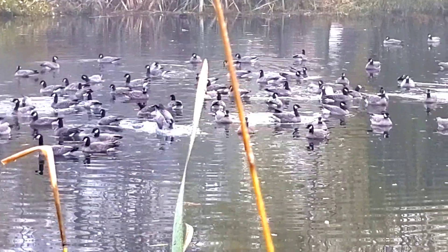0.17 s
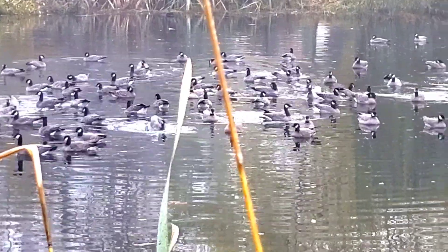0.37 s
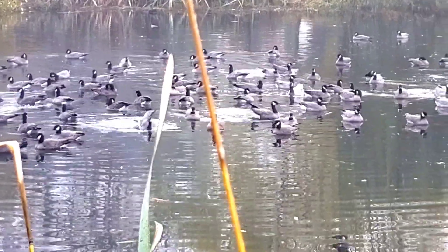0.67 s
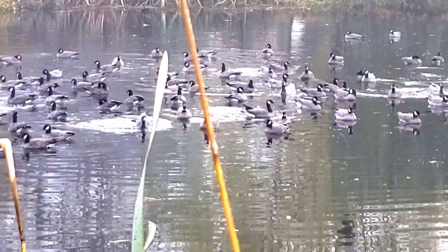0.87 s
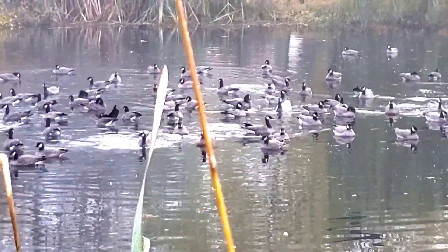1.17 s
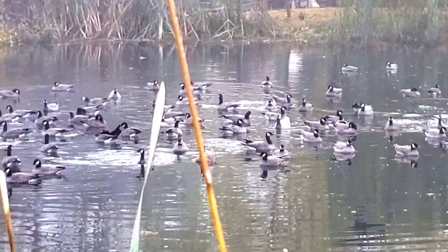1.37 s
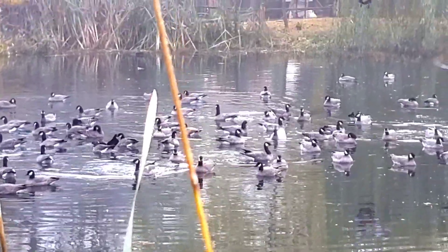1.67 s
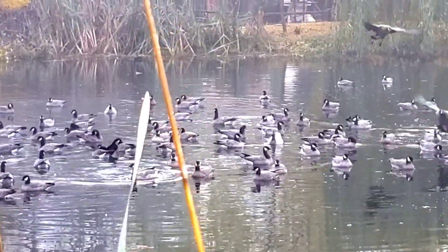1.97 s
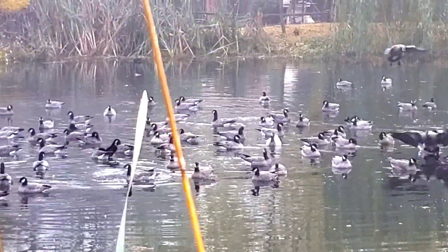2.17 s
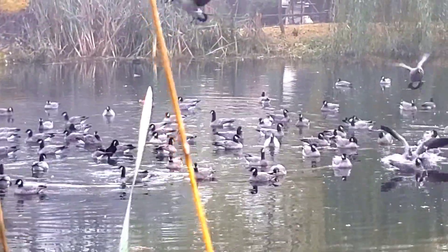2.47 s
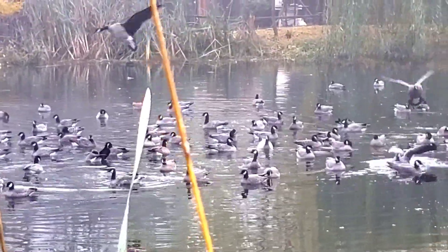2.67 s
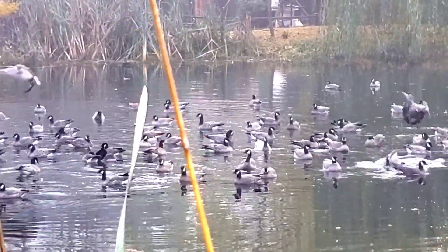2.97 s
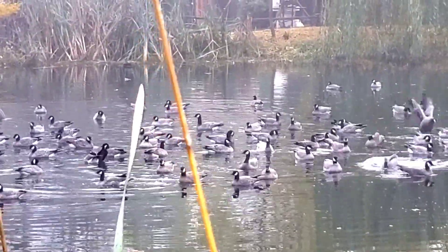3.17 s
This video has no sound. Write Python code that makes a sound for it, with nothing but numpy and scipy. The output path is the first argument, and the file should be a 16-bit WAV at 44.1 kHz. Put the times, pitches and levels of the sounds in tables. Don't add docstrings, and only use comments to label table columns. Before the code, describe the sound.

Geese honk over a pond, nasal and ringing, with overlapping calls from 0.2 to 0.7 seconds, softer ones around 1.0 to 1.3, a strong pair near 1.6 and a sharp, higher cry at 2.1. Banks echo them. From 2.3, landings thump, plop and slap with spray; low churning swells. Fainter honks follow near 2.9 and 3.2. Distant engine and traffic rumble and light water wash continue; right side muffled.

```python
import sys
import numpy as np
from scipy import signal
from scipy.fft import rfft, irfft, next_fast_len
from scipy.io import wavfile
from scipy.ndimage import uniform_filter1d, map_coordinates

SR = 44100
rng = np.random.default_rng(int(sys.argv[2]) if len(sys.argv) > 2 else 0)


def to_linear_factor(level_db):
    exponent = np.asarray(level_db, float) / 20
    return 10 ** exponent


def master_out(mix):
    frames = np.transpose(np.atleast_2d(mix))
    ceiling = np.clip(frames, -1, 1)
    pcm = np.round(ceiling * 32767).astype(np.int16)
    wavfile.write(sys.argv[1], SR, pcm)


N = 145971
TOP_HZ = 15750

# start_s, level_db
ENGINE_LOAD = [(0.1, -53.5), (0.14, -48.5), (0.63, -44.5), (0.99, -49), (1.04, -44), (1.55, -49.5),
               (1.62, -44.5), (2.49, -48.5), (2.5, -45), (3.29, -47), (3.31, -44)]
# freq_hz, level_db (per Hz)
DRONE_COLOUR = [(15, -65), (25, -45), (44, -8), (65, 3.5), (103, -7), (141, -10), (205, -18), (236, -16),
                (330, -21), (430, -48), (730, -120)]
# freq_hz, level_db (per Hz)
TRAFFIC_COLOUR = [(120, -29), (200, -0.5), (232, -16.5), (301, -23.5), (352, -13.5), (382, -11),
                  (657, -2.5), (3000, -36), (3900, -81), (6600, -120)]
# start_s, level_db
WASH_LEVEL = [(.09, -64.5), (.2, -59.5), (.25, -57), (.48, -58), (.66, -79), (1.1, -66.5), (1.5, -74.5),
              (1.7, -62), (2.05, -69.5), (2.3, -62.5), (2.46, -61.5), (2.75, -63), (3, -68.5),
              (3.31, -65.5)]
# freq_hz, level_db (per Hz)
WASH_COLOUR = [(880, 0), (1500, 2), (1620, 0), (2050, 1), (4120, -10), (5690, -25), (6590, -16),
               (10500, -27.5), (15600, -23)]
# start_s, pitch_hz
HONK_PITCH = [
    [(.217, 1015), (.232, 1058), (.245, 1069), (.282, 963)],
    [(.221, 1005), (.246, 958)],
    [(.225, 717), (.27, 750), (.307, 733)],
    [(.308, 746), (.335, 809), (.348, 856), (.357, 909), (.376, 895)],
    [(.364, 899.6), (.43, 813)],
    [(.355, 742), (.385, 800), (.415, 718)],
    [(.415, 677), (.44, 684), (.452, 670)],
    [(.455, 1038), (.464, 1075), (.495, 1053)],
    [(.482, 964), (.512, 861)],
    [(.605, 805), (.625, 828), (.652, 770)],
    [(.992, 809), (1.02, 870), (1.056, 771)],
    [(1.093, 738), (1.116, 765), (1.166, 654)],
    [(1.21, 663), (1.245, 774), (1.286, 655)],
    [(1.54, 722), (1.585, 872), (1.618, 813)],
    [(1.566, 913), (1.6, 1082), (1.62, 1120)],
    [(1.604, 1076), (1.63, 1092), (1.672, 971)],
    [(2.101, 1884), (2.118, 1839), (2.138, 2029), (2.16, 2116), (2.192, 2066)],
    [(2.178, 985), (2.216, 888)],
    [(2.868, 846.5), (2.89, 880.5), (2.91, 864), (2.942, 750)],
    [(3.215, 735), (3.235, 808), (3.275, 694)],
    [(.2, 1007), (.226, 980)],
    [(2.082, 3790), (2.108, 3670)],
]
# level_db, throat_hz, tilt_db (per octave), break_s (9 = never), echo_db
HONK_VOICE = [ (-26, 1870, -7.5, .228, 7), (-30.5, 1840, -8.5, .2, 11), (-43.5, 880, -5, 9, 5.5),
              (-24.5, 1960, -23, 9, 1), (-30.5, 1290, -10, .3, 1.5), (-36, 1600, -9, 9, -6),
              (-44.5, 700, -16, 9, 5), (-29, 2150, -8.5, 9, -9.5), (-30, 1390, -11, .4, -0.5),
              (-46.5, 2440, -10, 9, -5), (-50, 2510, -8.5, 9, 3), (-39.5, 1440, -14.5, 9, -0.5),
              (-52.5, 2220, -9, 9, -12.5), (-33.5, 1690, -11.5, 9, 0), (-24.5, 2080, -23, 9, -1.5),
              (-26.5, 1835, -12.5, 1.5, 3.5), (-23, 1950, -6.5, 2.108, -5.5), (-33, 1430, -4.5, 2.1, 0.5),
              (-35, 1830, -13, 9, -5.5), (-50.5, 1380, -10, 9, -2), (-39, 1980, -14, 9, 1),
              (-48, 3760, -14, 9, -8)]
# fundamental_db, beak_hz, beak_db, breath_db
HONK_HEAD = [ (5, 2100, -29, -27), (-8, 2480, -16.5, -23), (-0.5, 2200, -16, -27), (0.5, 2137, -1.5, -24),
             (-7.5, 2200, -21, -26), (-2, 2100, -26, -25), (0.5, 2000, -24, -32), (0, 5400, -17, -23),
             (-5, 2440, -17, -21), (4, 4100, -16, -24), (6.5, 1880, 4, -32), (1.5, 3760, -4.5, -23),
             (14.5, 1420, 7.5, -27), (0.5, 4040, -22, -31), (1.5, 5900, -24, -28), (4, 2750, -19.5, -27),
             (-3, 3150, -21, -28), (-11.5, 2500, -6, -14.5), (6, 5300, -17, -43), (-4, 3300, -16, -32),
             (-5.5, 3000, -22, -28), (0, 7500, -24, -34)]
# freq_hz, level_db
PORT_COLOUR = [(500, -4), (2000, -0.5), (2900, 0.5), (3900, -6), (5300, -9.5), (6600, 4.5), (9000, -7),
               (13000, -10)]
# freq_hz, t60_s
BANK_DECAY = [(500, 0.77), (2000, 1.29), (5000, 1.46), (12000, 0.4)]
# delay_s, level_db
BANK_SLAPS = [(.105, -26), (.165, -26), (.205, -24), (.235, -25), (.275, -26.5)]
# start_s, level_db
CHURN_LEVEL = [(2, -61.5), (2.3, -51), (2.6, -54), (2.8, -50.5), (3.05, -54.5), (3.31, -48.5)]
# freq_hz, level_db (per Hz)
CHURN_COLOUR = [(90, -11), (140, 9.5), (300, 8.5), (500, -31)]
# start_s, cavity_hz, level_db, rise_s, t60_s
BODY_PLUNGES = [
    (2.509, 220, -38, 0.0066, 0.11),
    (2.569, 290, -35, 0.0033, 0.15),
    (2.627, 300, -39, 0.0045, .1),
    (2.3, 135, -36.5, 0.021, 0.28),
    (2.95, 145, -39, .08, 0.96),
    (3, 280, -42, 0.038, 0.41),
]
# start_s, peak_db, spray_t60_s
SURFACE_SLAPS = [(2.375, -62.5, 0.1), (2.403, -62, 0.18), (2.447, -58.5, 0.68), (2.49, -64.5, .4),
                 (2.626, -65, .1), (2.685, -76, .05), (2.711, -63, 0.23), (2.875, -69, 0.078),
                 (3.065, -65, 0.063), (3.165, -70, 0.086), (3.271, -68, 0.086)]
# freq_hz, level_db (per Hz)
SPRAY_COLOUR = [(300, -27), (1500, -2), (4000, 4), (5700, -11), (7000, -3.5), (11000, -13), (14000, -2),
                (15600, -9.5)]
# freq_hz, likeness (0 to 1)
PORT_LIKENESS = [(60, 1), (180, 0.82), (550, 0.98), (1650, 0.057), (4970, 0.06), (15000, 0.04)]
# freq_hz, difference_db
RIGHT_MUFFLE = [(60, 1.8), (130, 0.5), (290, 6), (640, 8), (1410, 14), (2500, 20), (5500, 31), (9000, 5.5),
                (13000, 11)]
# freq_hz, lag_radians
RIGHT_LAG = [(100, 0), (600, 0.48), (1500, 1.24), (15000, 1.7)]


def unit(x):
    return x / np.sqrt(np.mean(x ** 2) + 1e-20)


def along(points, hz):
    f, v = np.transpose(points)
    return np.interp(np.log(hz + 1), np.log(f + 1), v)


def curve(rows):
    return np.interp(np.arange(N) / SR, *np.transpose(rows))


def wobble(rate, size=N):
    knots = rng.standard_normal(int(size * rate / SR) + 4)
    return map_coordinates(knots, [np.arange(size) * rate / SR])


def filtered(x, response):
    m = next_fast_len(N + SR // 2)
    return irfft(rfft(x, m) * response(np.fft.rfftfreq(m, 1 / SR)), m)[..., :N]


def rush(spectrum, patchy_db):
    z = signal.stft(rng.standard_normal((2, N)), nperseg=512)[2]
    patches = uniform_filter1d(rng.standard_normal(z.shape[1:]), 6, 0)
    patches = unit(uniform_filter1d(patches, 10, 1))
    a, b = signal.istft(z * to_linear_factor(patchy_db * patches), nperseg=512)[1][:, :N]

    def colour(hz):
        return to_linear_factor(along(spectrum, hz))

    def like(hz):
        return np.clip(along(PORT_LIKENESS, hz), 0, 1)

    left = filtered(a, colour)
    shared = filtered(a, lambda hz: colour(hz) * like(hz))
    own = filtered(b, lambda hz: colour(hz) * np.sqrt(1 - like(hz) ** 2))
    return np.array([left, shared + own]) / np.std(left)


def engine():
    return to_linear_factor(curve(ENGINE_LOAD) + 2.5) * rush(DRONE_COLOUR, patchy_db=0.3)


def traffic():
    level_db = -48.5 + 1 * wobble(3.29)
    return to_linear_factor(level_db) * rush(TRAFFIC_COLOUR, patchy_db=1.5)


def droplets():
    return to_linear_factor(2.3 * wobble(150) + wobble(14))


def wash(drops):
    return to_linear_factor(curve(WASH_LEVEL) + 12) * drops * rush(WASH_COLOUR, patchy_db=2.0)


def honk(points, level_db, throat_hz, tilt_db, break_s, fundamental_db, beak_hz, beak_db, breath_db):
    s, hz = np.transpose(points)
    t = np.arange(s[0], s[-1], 1 / SR)
    arch = map_coordinates(hz, [np.interp(t, s, np.arange(len(s)))], order=2, mode="nearest")
    jitter = 1 + .005 * wobble(277, size=len(t))
    pitch = uniform_filter1d(arch, size=300) * jitter
    k = np.arange(1, 32)[:, None] / 2
    f = k * pitch
    faint = np.clip(-29 - level_db, 0, 12)

    def resonance(centre_hz, width_hz=350):
        return 1 / np.abs(1 + 2j * (f - centre_hz) / width_hz) ** 2

    peaks = resonance(throat_hz) + to_linear_factor(beak_db) * resonance(beak_hz)
    floor_db = -14 + faint / 2 + tilt_db * np.log2(np.maximum(f / throat_hz, 1))
    beak_low_cut = 1 + (630 / f) ** 8
    gain = (peaks + to_linear_factor(floor_db)) / beak_low_cut

    broken = np.clip((t - break_s) / 0.015, 0, 1)
    halfway, whole = to_linear_factor(0.5) * broken, to_linear_factor(-1 * broken)
    gain = gain * np.where(k % 1 > 0, halfway, whole) * (f < TOP_HZ)
    flutter = wobble(70.3, size=k.size * len(t)).reshape(k.size, -1)
    gain = gain * to_linear_factor(2.2 * np.sqrt(k) * flutter)

    chest_hz = 1150
    chest_db = fundamental_db * (f < chest_hz) * (f > chest_hz / 2)
    turned_db, air_db = .55 * (k == 1), 1.2 * (f / 5000) ** 2
    gain = gain * to_linear_factor(faint * (turned_db - air_db) + chest_db)

    phase = 2 * np.pi * np.cumsum(pitch) / SR
    tone = np.sum(gain * np.sin(k * phase + rng.uniform(0, 2 * np.pi, k.shape)), 0)
    breath = signal.lfilter([1, -1], [1, -1.5, .75], rng.standard_normal(len(t)))
    puffs = 1 + np.cos(phase)
    tone = tone + to_linear_factor(breath_db - faint / 2) * puffs * unit(breath)
    effort_db = 45 * (pitch / pitch.max() - 1)
    attack_s, release_s = 0.0073, 0.0067
    shape = np.clip((t - s[0]) / attack_s, 0, 1) * np.clip((s[-1] - t) / release_s, 0, 1)
    return to_linear_factor(level_db + 5) * np.sin(np.pi / 2 * shape) ** 2 * tone * to_linear_factor(effort_db)


def banks(call):
    near_db, far_db, far_s, far_spread_s = -18, -17, 0.22, 0.05
    right_db = 1
    hz, t, z = signal.stft(rng.standard_normal((2, SR * 2 // 3)), SR, nperseg=256)
    far = to_linear_factor(far_db - near_db) * np.exp(-.5 * ((t - far_s) / far_spread_s) ** 2)
    decay = to_linear_factor(-60 * t / along(BANK_DECAY, hz)[:, None])
    tail = signal.istft(z * (decay * (1 + far)), SR, nperseg=256)[1]
    tail = tail / np.linalg.norm(tail[0])
    return to_linear_factor(near_db) * signal.fftconvolve(call[None], tail, axes=1) * to_linear_factor([[0], [right_db]])


def geese():
    out = np.zeros((2, N + 2 * SR))
    for points, (*voice, echo_db), head in zip(HONK_PITCH, HONK_VOICE, HONK_HEAD):
        call = honk(points, *voice, *head)
        at = round(points[0][0] * SR)
        out[:, at:at + len(call)] += call
        wet = to_linear_factor(echo_db) * banks(call)
        out[:, at + 200:at + 200 + wet.shape[1]] += wet
        dulled = uniform_filter1d(call, size=5)
        for delay_s, level_db in BANK_SLAPS:
            start = at + round(delay_s * SR)
            uneven_db = rng.normal(0, 1.8, (2, 1))
            out[:, start:start + len(call)] += to_linear_factor(echo_db + level_db + uneven_db) * dulled
    return filtered(out[:, :N], lambda hz: to_linear_factor(along(PORT_COLOUR, hz) - along(PORT_COLOUR, 2980)))


def churn():
    return to_linear_factor(curve(CHURN_LEVEL) + 2.15 * wobble(13)) * rush(CHURN_COLOUR, patchy_db=2.5)


def dying(start_s, t60_s):
    t = np.arange(N) / SR
    return to_linear_factor(-60 * np.clip(t - start_s, 0, 2) / t60_s) * (t > start_s)


def plunges():
    t = np.arange(N) / SR
    out = np.zeros(N)
    for start_s, cavity_hz, level_db, rise_s, t60_s in BODY_PLUNGES:
        level = to_linear_factor(level_db + 2.4 * wobble(30.07))
        rise = np.clip((t - start_s) / rise_s, 0, 1)
        pitch = cavity_hz * (1 + 0.0815 * wobble(40))
        boom = np.sin(2 * np.pi * np.cumsum(pitch) / SR)
        out += level * dying(start_s, t60_s) * rise * boom
    return out


def splashes(drops):
    bursts = np.zeros(N)
    for start_s, peak_db, spray_t60_s in SURFACE_SLAPS:
        slap = dying(start_s, .03)
        spray = to_linear_factor(-6) * dying(start_s, spray_t60_s)
        bursts += to_linear_factor(peak_db + 6.5) * (slap + spray)
    return bursts * drops * rush(SPRAY_COLOUR, patchy_db=0.5)


def scene():
    air = geese() + engine() + traffic()
    drops = droplets()
    water = wash(drops) + splashes(drops) + plunges() + churn()
    return air + water


def roll_off(x):
    return signal.sosfilt(signal.butter(12, 15750, fs=SR, output="sos"), x)


def record(dry):
    def ports(hz):
        left = np.ones_like(hz)
        right = to_linear_factor(-along(RIGHT_MUFFLE, hz)) * np.exp(-1j * along(RIGHT_LAG, hz))
        return (hz < TOP_HZ) * np.array([left, right])

    start_s, fade_s = 0.076, 0.016
    fade = np.clip((np.arange(N) / SR - start_s) / fade_s, 0, 1) ** 2
    return roll_off(filtered(dry, ports) * fade)


dry = scene()
out = record(dry)
master_out(out)
```